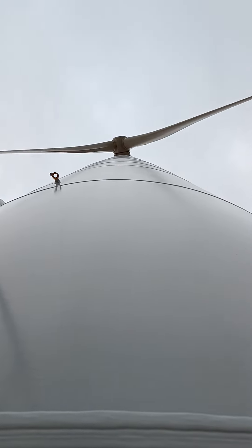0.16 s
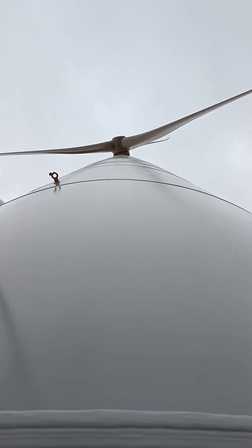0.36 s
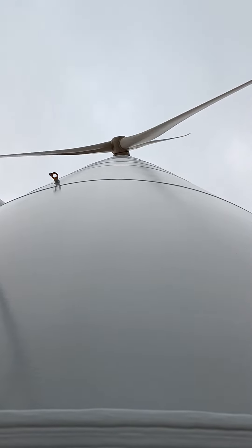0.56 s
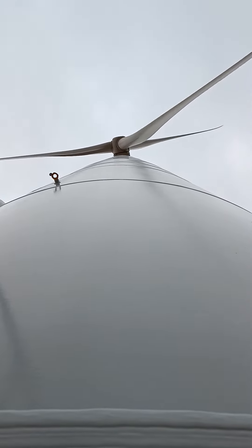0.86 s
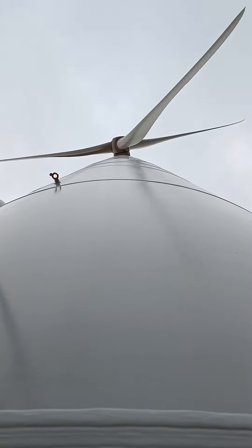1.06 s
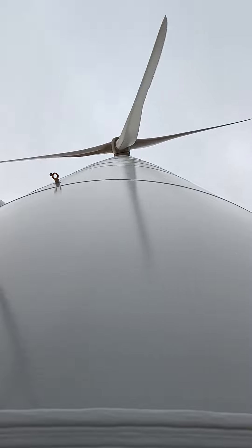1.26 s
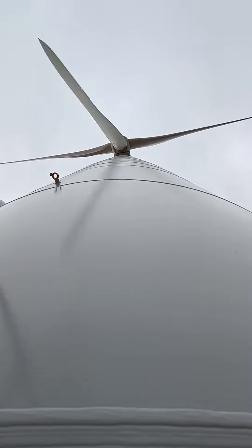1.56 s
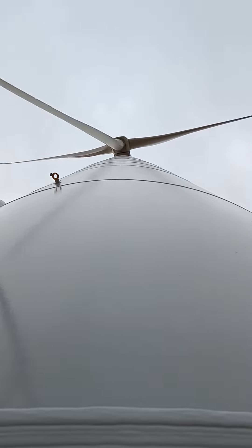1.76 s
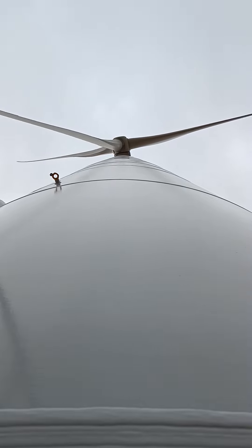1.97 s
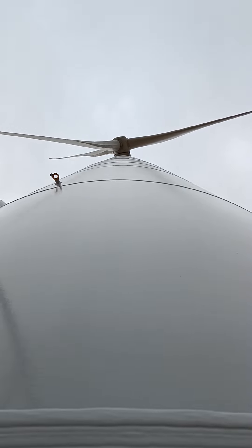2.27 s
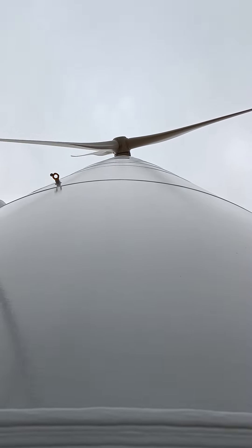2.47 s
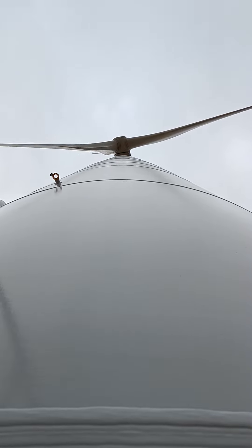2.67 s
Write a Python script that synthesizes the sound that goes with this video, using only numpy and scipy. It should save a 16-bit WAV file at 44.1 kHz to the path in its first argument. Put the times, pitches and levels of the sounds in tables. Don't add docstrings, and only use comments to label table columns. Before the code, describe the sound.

Gusty wind rumble and flapping pops on the microphone, with a soft whistling turbine blade swish

```python
import sys
import numpy as np
from scipy import signal
from scipy.fft import rfft, irfft
from scipy.io import wavfile
from scipy.ndimage import uniform_filter1d, map_coordinates

SR = 44100
rng = np.random.default_rng(int(sys.argv[2]) if len(sys.argv) > 2 else 0)


def makeup_ratio(level_db):
    decades = np.asarray(level_db, float) / 20
    return 10 ** decades


def master(y):
    cut = np.clip(np.atleast_2d(y).T, -1, 1)
    pcm = np.round(cut * 32767)
    wavfile.write(sys.argv[1], SR, pcm.astype(np.int16))


N = 123921
T = np.arange(N) / SR

# pitch_hz, level_db (per Hz)
FIELD_LEFT = [(60, -6), (100, -9), (220, -0.5), (330, -13.5), (800, -22.5), (2000, -29.5), (4500, -34),
              (12000, -40.5)]
FIELD_RIGHT = [(100, 2), (400, -12), (800, -19.5), (2000, -24.5), (4500, -35), (12000, -51.5)]
# time_s, left_db, right_db
GUSTS = [(0.0, -34, -45), (0.168, -43.5, -33.5), (0.328, -43, -42.5), (0.498, -46, -41.5),
         (0.661, -45, -37.5), (0.827, -46.5, -35.5), (0.989, -41.5, -29), (1.16, -43.5, -33.5),
         (1.316, -41.5, -33.5), (1.489, -48.5, -35.5), (1.65, -48.5, -32), (1.819, -47.5, -28),
         (1.979, -47.5, -30), (2.15, -49, -33), (2.31, -48.5, -28), (2.479, -50, -30), (2.64, -44, -30),
         (2.81, -43.5, -30.5)]
# pitch_hz, level_db (per Hz)
RUMBLE = [(25, -6), (45, -35), (80, 0), (130, 0.5), (210, -4.5), (320, -16), (500, -29), (900, -60)]
# peak_s, peak_db, swirl_hz, length_ms
LEFT_BUFFETS = [(0.029, -23, 161.5, 20.8), (0.054, -33, 222.7, 24.4), (0.081, -50, 142, 19),
                (0.107, -29.5, 214.6, 14), (0.249, -28.5, 171, 5.9), (0.289, -32.5, 136, 8.1),
                (0.379, -32, 149.6, 12), (0.453, -28.9, 160.4, 27), (0.575, -38, 148.5, 14),
                (0.597, -42, 182, 18.4), (0.622, -33, 158.3, 16), (0.705, -34, 166, 9),
                (0.75, -36.5, 161.4, 16), (0.934, -34, 116.2, 54), (1.031, -40, 139, 7.6),
                (1.14, -27.5, 130.3, 9.5), (1.18, -50, 133, 9.9), (1.245, -22, 213.7, 8.3),
                (1.355, -35, 157, 17), (1.407, -28, 151, 18.4), (2.642, -31, 167.6, 9.4),
                (2.7, -30.5, 204.2, 7.5)]
# peak_s, peak_db, swirl_hz, length_ms
RIGHT_BUFFETS = [(0.04, -30.5, 140.7, 29.5), (0.132, -20, 170, 22), (0.161, -20.5, 169, 12.3),
                 (0.221, -21, 127.6, 3.9), (0.28, -29, 173, 11), (0.475, -26, 136.7, 15),
                 (0.578, -28, 197.5, 30.4), (0.688, -21, 158, 22.5), (0.772, -22, 171, 31),
                 (0.847, -30.5, 200.4, 13.8), (0.922, -22.5, 140.3, 37.3), (0.978, -20.5, 183.2, 19.6),
                 (1.034, -20.5, 200, 27.3), (1.058, -22.5, 91, 42), (1.066, -18.5, 168.7, 36.6),
                 (1.08, -21, 330, 42.4), (1.119, -17.5, 139, 31.7), (1.161, -22.5, 153.3, 10),
                 (1.36, -31.5, 92.4, 33), (1.227, -16.5, 146, 17.6), (1.288, -23.5, 188, 18),
                 (1.328, -23.5, 132.4, 35), (1.454, -26, 223, 6.6), (1.476, -19.5, 218, 11.6),
                 (1.511, -18.5, 195.5, 8.9), (1.529, -17.5, 222.6, 8.6),
                 (1.577, -24.0, 186.6, 10), (1.646, -19, 211, 17.6), (1.702, -26, 172.4, 55.5),
                 (1.729, -29.5, 83, 34), (1.748, -20, 330, 9.6), (1.755, -16.5, 148.4, 15),
                 (1.792, -22.5, 136, 48), (1.844, -26, 358.7, 11.7), (1.866, -21.5, 125, 59),
                 (1.922, -20, 181, 51), (1.963, -24, 179.4, 51), (2.019, -27, 190, 15.7),
                 (2.227, -21.5, 207.4, 15.3), (2.246, -19, 188.2, 14.4), (2.269, -18, 167.9, 19),
                 (2.292, -21, 223, 7.8), (2.352, -18, 219.6, 13.2), (2.384, -19, 206.6, 8.7),
                 (2.427, -19.5, 167, 18), (2.472, -16, 152, 14.6), (2.512, -17.5, 397, 5.9),
                 (2.519, -13, 188.5, 11.3), (2.523, -24, 93.4, 56), (2.551, -14, 252.3, 15.1),
                 (2.563, -12.5, 133.8, 18), (2.64, -20.5, 249.4, 18.2), (2.69, -22.5, 161, 11),
                 (2.729, -29.5, 165.7, 12.5), (2.788, -18, 168.3, 11.4)]
# middle_s, depth_db, length_ms
LULLS = [
    (0.549, -2.5, 35),
    (1.192, -11, 12.4),
    (1.252, -10, 20),
    (1.431, -6.5, 27),
    (1.597, -9, 26),
    (2.082, -20, 17),
    (2.45, -10.5, 22.7),
    (2.591, -7, 28),
    (2.665, -5, 14),
    (2.751, -2.5, 17),
]
# peak_s, peak_db
SNAPS = [(0.126, -42.5), (0.162, -45), (0.688, -45), (1.044, -38.5), (1.058, -40), (1.078, -36),
         (1.098, -43), (1.453, -45), (1.471, -42.5), (1.515, -35), (1.641, -38), (1.711, -37),
         (1.745, -35.5), (1.81, -37.5), (1.839, -34.5), (1.903, -36), (1.928, -39.5), (1.974, -37),
         (2.012, -47), (2.044, -44), (2.207, -45), (2.242, -42.5), (2.262, -44), (2.287, -35), (2.32, -61),
         (2.35, -43), (2.39, -37.5), (2.468, -42), (2.511, -28), (2.548, -29.5), (2.557, -23.5),
         (2.642, -52), (2.679, -48), (2.707, -52), (2.767, -50), (2.788, -38.5)]
# pitch_hz, level_db (per Hz)
SWISH = [(300, 3), (700, 7), (1300, -2.5), (2200, -2), (3200, -4), (5000, -13), (7500, -36), (12000, -44)]
# time_s, swish_db, whistle_db
BLADE = [
    (0, -105, -80),
    (.3, -70.5, -75),
    (.7, -58.5, -68),
    (1.0, -57, -69),
    (1.33, -54, -63.5),
    (1.43, -55.5, -68),
    (1.85, -65.5, -71.5),
    (2.05, -71, -82),
    (2.81, -69.5, -93),
]
# middle_s, span_s, pitch_hz, width_hz, level_db
PUFFS = [
    (.33, 0.48, 1200, 250, -64),
    (.51, 0.06, 690, 438, -58.5),
    (2.18, 0.032, 6400, 4990, -67),
]
# rest_pitch_hz, width_hz, left_db, right_db, leaving_gain_db
WHISTLES = [
    (7950, 230, -10.5, -5.5, -12),
    (8690, 206, -7, 0.5, 3),
    (9720, 150, -10, -4, 3.5),
    (9060, 1600, -5, -1, -3),
]
# pitch_hz, level_db (per Hz)
WAKE = [(2000, 1.5), (4000, -3), (6000, 3.5), (12000, -24)]
# pitch_hz, width_hz, gain_db
PORTS = [
    (8070, 900, 1),
    (9125, 860, 7),
]


def evened(x):
    return x / np.sqrt(np.mean(x ** 2) + 1e-20)


def flattened(x):
    evenness = 0.56
    return evened(x / (abs(signal.hilbert(x)) + 0.33) ** evenness)


def read(points, hz):
    f, value = np.transpose(points)
    return np.interp(np.log(hz + 1), np.log(f + 1), value)


def slow(n, span):
    w = max(round(span), 1)
    noise = uniform_filter1d(rng.standard_normal(n + 4000), w)
    return evened(uniform_filter1d(noise, w)[2000:2000 + n])


def add(mix, s, sound):
    start = round(s * SR) - len(sound) // 2
    part = mix[max(start, 0):max(start + len(sound), 0)]
    part += sound[max(-start, 0):][:len(part)]


def air(points, patch_db):
    frames, hz = N // 256 + 5, np.fft.rfftfreq(1024, 1 / SR)
    a, b, patches = rng.standard_normal((frames, 513, 3)).T
    patches = uniform_filter1d(patches, size=10, axis=0)
    patches = evened(uniform_filter1d(patches, size=12, axis=1))
    z = (a + 1j * b) * makeup_ratio(read(points, hz)[:, None] + patch_db * patches)
    return evened(signal.istft(z, nperseg=1024, noverlap=768)[1][:N])


def resonate(x, hz, width):
    turn = np.exp(2j * np.pi * np.cumsum(hz * np.ones(len(x))) / SR)
    r = np.exp(-np.pi * width / SR)
    return 2 * (turn * signal.lfilter([1 - r], [1, -r], x / turn + 1e-18)).real


def ring_twice(x, hz, width):
    return resonate(resonate(x, hz, width), hz, 2 * width)


def breathy_tone(hz, width):
    return evened(ring_twice(rng.standard_normal(N), hz, width))


def field():
    swell = makeup_ratio(-0.6 * slow(N, .15 * SR))
    left = makeup_ratio(-48) * swell * air(FIELD_LEFT, patch_db=1.83)
    right = makeup_ratio(-46.5) * swell * air(FIELD_RIGHT, patch_db=1.83)
    return np.array([left, right])


def rumble(gust_db):
    calm_db, lump_db, lump_s = -50, 3.5, .008
    db = gust_db + lump_db * np.clip((gust_db - calm_db) / 8, .1, 1) * slow(N, lump_s * SR)
    hz = np.fft.rfftfreq(2 * N, 1 / SR)
    eddies = irfft(rfft(rng.standard_normal(2 * N)) * makeup_ratio(read(RUMBLE, hz)))
    eddies = flattened(evened(eddies))
    speed = np.clip(np.exp(0.0171 * (db + 35)), .5, 1.9)
    moving = map_coordinates(eddies, [np.cumsum(speed)], order=3)
    strength = np.sqrt(np.maximum(makeup_ratio(2 * db) - makeup_ratio(2 * calm_db + 0.5), 0))
    return strength * moving


def whine():
    pitch_hz, width_hz, fade_db_per_s = 7950, 15, -18
    out = np.zeros((2, N))
    for c, db in enumerate((-77.5, -89)):
        tone = evened(resonate(rng.standard_normal(N), pitch_hz, width_hz))
        out[c] = makeup_ratio(db + fade_db_per_s * T) * tone
    return out


def buffet(db, hz, ms):
    wander, sag, swirl_db, steep = 0.1724, 0.2494, -6, 3.64
    t = np.arange(-2048, 2048) / SR
    place = 1000 * t / ms
    pitch = hz * np.exp(wander * slow(len(t), 136.3) - sag * np.clip(place, -1, 1))
    swings = np.cos(2 * np.pi * (np.cumsum(pitch) / SR + rng.random()))
    f = np.fft.rfftfreq(len(t), 1 / SR) / hz
    swirl = evened(irfft(rfft(rng.standard_normal(len(t))) * (f * np.exp(-f)) ** steep))
    bell = makeup_ratio(db - 33.2 * place ** 2)
    wave = bell * flattened(swings + makeup_ratio(swirl_db) * swirl)
    return evened(wave) * np.sqrt(np.mean(bell ** 2) / 2)


def lulls():
    dips_db = np.zeros(N)
    for at, depth_db, ms in LULLS:
        dips_db += depth_db * np.exp(-2 * (1000 * (T - at) / ms) ** 2)
    return makeup_ratio(dips_db)


def snap(db):
    pitch_hz, steep, boost_db = 330 * np.exp(0.013 * (db + 22)), 2.16, 12
    f = np.fft.rfftfreq(2048, 1 / SR) / pitch_hz
    flick = irfft((f * np.exp(-f)) ** steep * np.exp(2j * np.pi * rng.random()))
    flick = np.fft.fftshift(flick)
    return makeup_ratio(db + boost_db) * flick / abs(signal.hilbert(flick)).max()


def wind():
    s, left_db, right_db = np.transpose(GUSTS)
    left = rumble(np.interp(T, s, left_db))
    right = rumble(np.interp(T, s, right_db))
    for at, *row in LEFT_BUFFETS:
        add(left, at, buffet(*row))
    for at, *row in RIGHT_BUFFETS:
        add(right, at, buffet(*row))
    right *= lulls()
    snap_late_s = 0.002973
    for at, db in SNAPS:
        add(right, at + snap_late_s, snap(db))
    ending = np.minimum((T[-1] - T) / 0.0045, 1)
    return np.array([left, right]) * ending


def swish():
    s, swish_db, _ = np.transpose(BLADE)
    near = makeup_ratio(np.interp(T, s, swish_db))
    return np.array([near * air(SWISH, patch_db=-0.5) for _ in range(2)])


def whistles():
    pass_s, pass_width_s, shift, flutter_db = 1.498, 0.62, 0.13, 2
    s, _, whistle_db = np.transpose(BLADE)
    near_db = np.interp(T, s, whistle_db)
    x = (T - pass_s) / pass_width_s
    slide = 1 - shift * x / np.sqrt(1 + x ** 2)
    out = np.zeros((2, N))
    for c in (0, 1):
        for hz, width, *port_db, leave_db in WHISTLES:
            db = near_db + port_db[c] + leave_db * np.clip(x, 0, 1)
            db += flutter_db * slow(N, 1700)
            out[c] += makeup_ratio(db) * breathy_tone(hz * slide, width)
    return out


def puffs():
    out = np.zeros((2, N))
    for c in (0, 1):
        for at, span, hz, width, db in PUFFS:
            bell = makeup_ratio(db - 6.2 * ((T - at) / span) ** 2)
            out[c] += bell * breathy_tone(hz, width)
    return out


def wake():
    rise_s = 0.21
    gusty_db = 0.98 * slow(N, 2500)
    out = np.zeros((2, N))
    for c, (db, start_s) in enumerate(((-64.5, 0.35), (-73, 0.6))):
        growth = 1 / (1 + np.exp((start_s - T) / rise_s))
        out[c] = makeup_ratio(db + gusty_db) * air(WAKE, patch_db=2.0) * growth
    return out


def scene():
    blade = swish() + whistles() + puffs() + wake()
    return field() + whine() + wind() + blade


def top_cut(x):
    return signal.sosfilt(signal.butter(12, 15740, fs=SR, output="sos"), x)


def record(dry):
    rung = np.array([x + makeup_ratio(db) * ring_twice(x, hz, width) for x, (hz, width, db) in zip(dry, PORTS)])
    rolled = signal.sosfilt(signal.butter(4, 10130, fs=SR, output="sos"), rung)
    rolled = signal.sosfilt(signal.butter(3, 51, "high", fs=SR, output="sos"), rolled)
    self_noise = makeup_ratio(-73.5) * rng.standard_normal((2, N))
    return top_cut(rolled + self_noise)


dry = scene()
out = record(dry)
master(out)
```